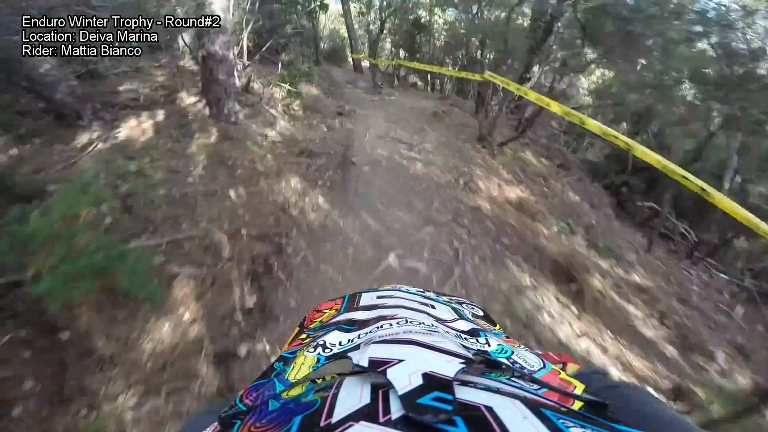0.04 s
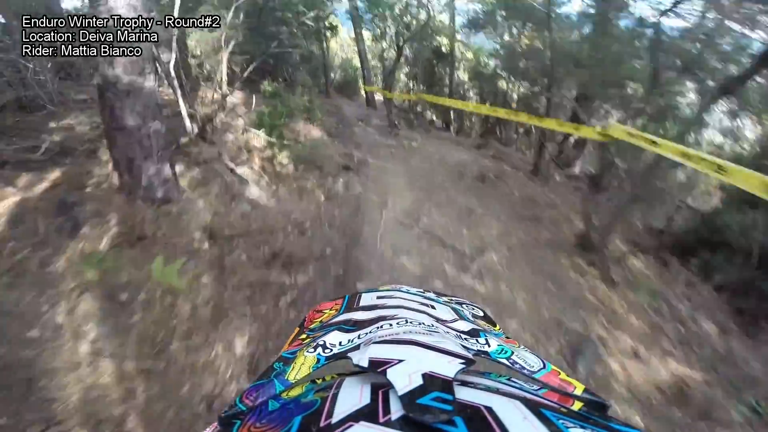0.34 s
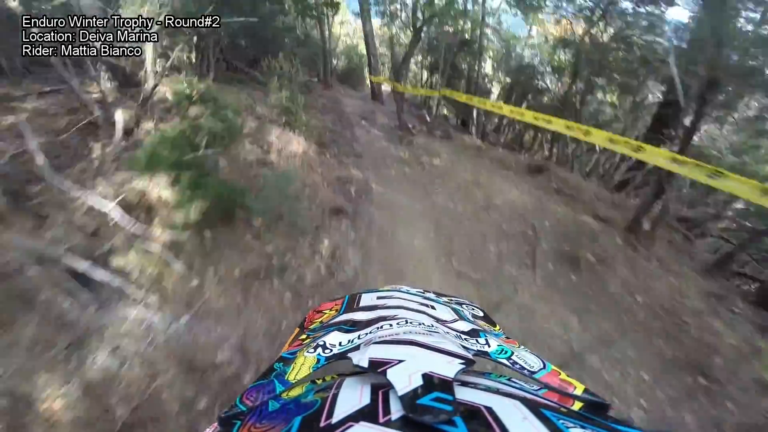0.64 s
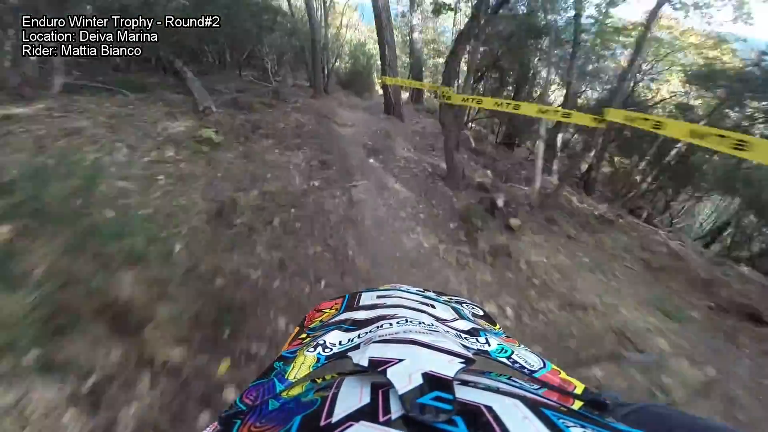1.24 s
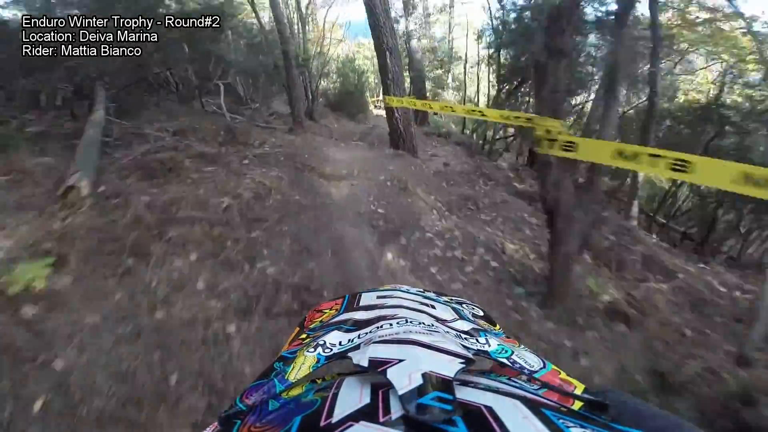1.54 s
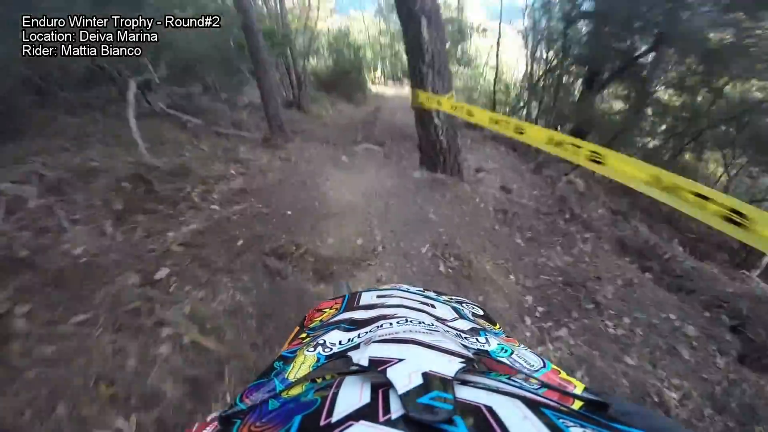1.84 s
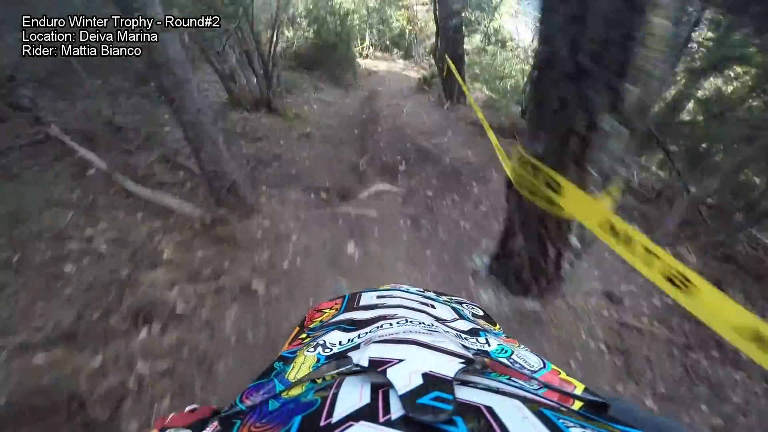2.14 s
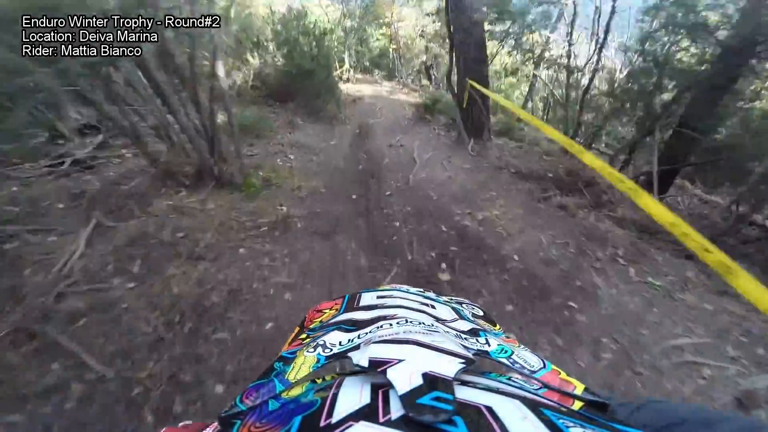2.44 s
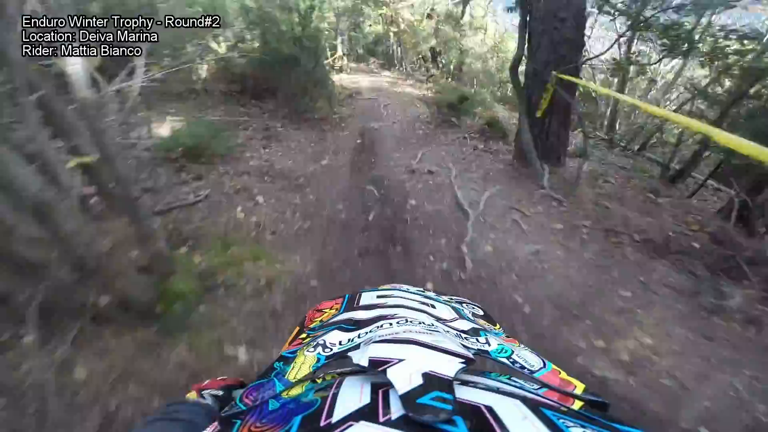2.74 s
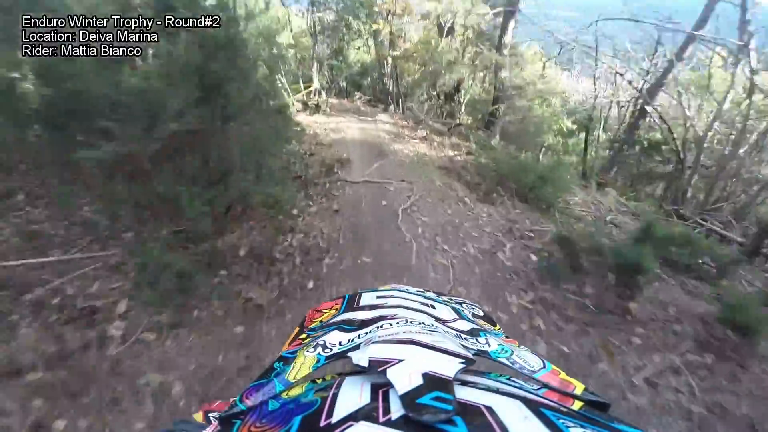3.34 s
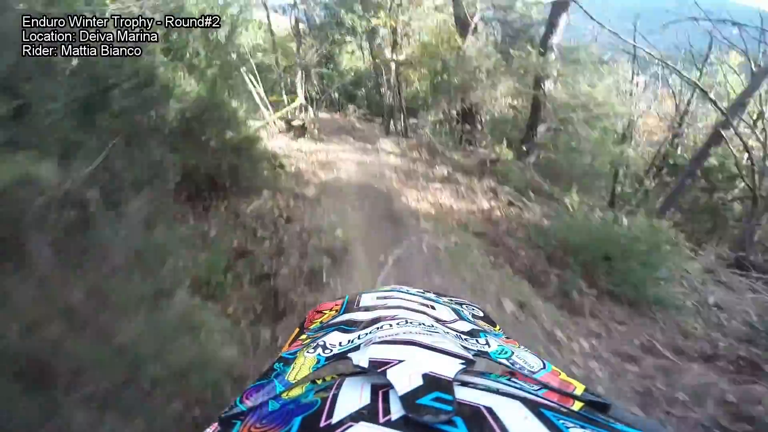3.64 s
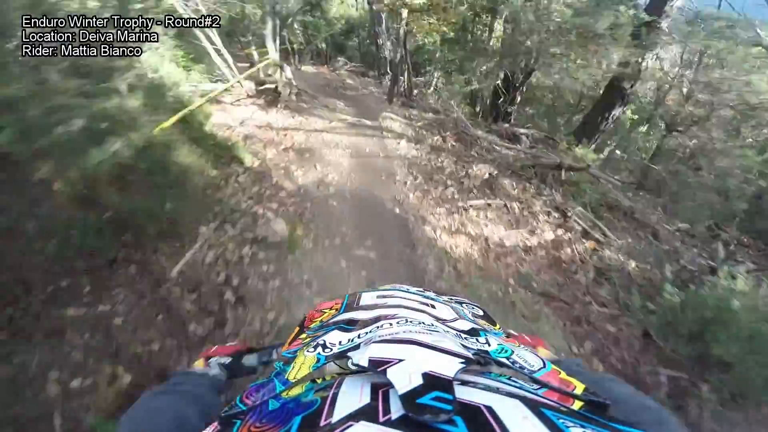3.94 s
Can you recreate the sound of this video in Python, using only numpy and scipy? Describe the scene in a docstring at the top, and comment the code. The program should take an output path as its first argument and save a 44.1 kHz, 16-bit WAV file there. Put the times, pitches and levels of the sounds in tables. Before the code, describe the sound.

A mountain bike runs down a rough forest trail, heard from the rider's helmet. Deep wind buffets the microphone throughout while the tyres rumble and crackle over grit, and the chain and fittings knock sharply at irregular moments.

```python
"""Deep wind buffeting, a hollow rush and sharp knocks: a mountain bike runs down a rough forest trail.
It is heard from a camera on the rider's helmet. Bumps shake the mount and wind hits the microphone.
Air and tyres make the rush, which swells and sinks, while grit crackles under the wheels.
Chain and fittings knock in quick double contacts, the drivetrain ticks and the camera whines faintly."""
import sys
import numpy as np
from scipy import signal
from scipy.fft import rfft, irfft
from scipy.io import wavfile
from scipy.ndimage import uniform_filter1d

SR = 44100
rng = np.random.default_rng(int(sys.argv[2]) if len(sys.argv) > 2 else 0)


def to_wav(s):
    """Save 16-bit WAV."""
    ch = np.atleast_2d(s).T  # columns
    pcm = np.round(np.clip(ch, -1, 1) * 32767)  # PCM
    wavfile.write(sys.argv[1], SR, pcm.astype(np.int16))


N = 176400
T = np.arange(N) / SR

# The tone colour of each sound. Each row: frequency in Hz, relative level in dB.
CAMERA_HISS_COLOUR = [(100, -1), (8000, 4), (11800, -1), (13000, -7), (15000, -15), (16000, -23)]
TICK_COLOUR = [(1500, -8), (3300, -27), (3900, -10.5), (4500, 0.5), (4900, -13), (5300, -18), (8000, -26),
               (16000, -50)]
DRONE_COLOUR = [(40, -2.5), (82, 1.5), (118, -4), (145, 3.5), (175, -5.5), (230, -14.5), (400, -20),
                (2000, -56)]
ROAR_COLOUR = [(80, -14), (200, 2), (300, 0), (420, -2.5), (650, -6), (850, -5.5), (1200, -10),
               (2500, -23.5), (8000, -49)]
DIRT_COLOUR = [(1500, 7.5), (3600, -3), (4400, 5.5), (5200, 4), (5900, -11), (6600, -3), (7500, -14),
               (9000, -12), (11500, -23), (13000, -28), (16000, -36)]
GRIT_COLOUR = [(500, -11), (1500, 8), (2800, 18), (3300, -8), (4500, -2.5), (5300, -1.5), (6500, -1.5),
               (8000, -26), (11500, -15.5), (14000, -39), (16000, -34)]
SCUFF_COLOUR = [(1500, -4), (4500, 11), (6500, -1), (9000, -1), (11500, -9), (13000, -22), (16000, -28)]
HOLLOW_COLOUR = [(300, -40), (900, -23), (1170, -14.5), (1265, -7.5), (1318, 1), (1370, 1), (1450, -2.5),
                 (1620, -2.5), (1760, -9), (1950, -16), (2500, -36), (6000, -64)]
UPPER_RUSH_COLOUR = [(600, -15), (1500, 0), (2000, -6), (2280, 1), (2420, -1), (2620, 3), (2900, -1),
                     (3170, -4), (3370, -11.5), (3550, -5), (3780, -5), (4100, -20), (6000, -21),
                     (12000, -79)]
BUFFET_COLOUR = [(4, -20), (11, 7.5), (22, -3), (33, -8), (47, -3), (54, -17), (63, -22), (80, -38.5),
                 (110, -45), (300, -107), (1000, -100)]
CLICK_COLOUR = [(300, 3.5), (900, -9.5), (2600, -1.5), (3500, -3), (4500, 1.5), (5700, 0.5), (6600, -4.5),
                (7300, 3), (8100, -2), (9200, -9.5), (12000, -11.5), (13500, -26), (16000, -30)]

# How each sound swells and sinks. Each row: time in seconds, relative level in dB.
TICK_LEVELS = [(0, -79), (1.6, -72), (2, -63), (2.7, -66.5), (3, -61), (3.5, -64.5), (4, -66)]
DIRT_LEVELS = [(0, -64), (.24, -56.5), (.6, -60), (1, -57), (1.28, -55), (1.5, -69), (1.75, -69),
               (2.1, -66), (2.35, -55.5), (2.65, -66), (2.9, -67), (3.2, -61), (3.5, -69), (4, -67)]
GRIT_LEVELS = [(0, -54), (.4, -53.5), (.55, -53), (1.15, -54), (1.6, -62), (2.1, -57.5), (2.22, -55),
               (2.5, -67), (2.67, -48), (2.8, -60), (2.95, -53), (3.2, -57), (3.45, -63), (3.8, -55),
               (4, -60)]
BUFFET_LEVELS = [(0, -29.5), (.25, -21.5), (.7, -24.5), (1.2, -22.5), (1.5, -28), (1.75, -32.5), (1.9, -24),
                 (2.3, -24), (2.75, -23.5), (2.86, -29.5), (2.95, -21), (3.4, -20.5), (3.8, -24.5),
                 (4, -22.5)]
# Tyre rumble. Each row: time in seconds, then relative levels of the low drone and the roar in dB.
RUMBLE_LEVELS = [(0, -49, -53.5), (.5, -53, -51.5), (1.1, -45.5, -51.5), (1.45, -51.5, -51.5),
                 (1.75, -46, -53.5), (2.1, -57, -53.5), (2.5, -48, -55.5), (2.85, -52.5, -55),
                 (3.2, -60, -52), (3.6, -51, -55.5), (4, -53, -53)]
# The rush. Each row: time in seconds, then relative levels of the hollow and the upper part in dB.
RUSH_LEVELS = [(0, -40.5, -49), (.12, -43.5, -49.5), (.22, -38.5, -48.5), (.33, -43, -49.5),
               (.68, -43.5, -48.5), (.8, -40, -47), (.97, -39.5, -47), (1.15, -39, -45), (1.33, -36.5, -43),
               (1.48, -40, -47), (1.61, -40, -47.5), (1.71, -46.5, -53), (1.86, -40, -47),
               (1.99, -51.5, -57), (2.07, -44.5, -54), (2.17, -51.5, -59), (2.3, -54.5, -59),
               (2.47, -44.5, -52.5), (2.56, -46, -55), (2.62, -52, -63), (2.67, -42, -51), (2.84, -49, -56),
               (2.98, -41, -51.5), (3.13, -41.5, -49), (3.26, -41.5, -49), (3.42, -41, -49),
               (3.57, -50, -55), (3.68, -46.5, -57.5), (3.78, -43.5, -51), (4, -44, -54.5)]

# The camera's whine. Each row: pitch in Hz, level in dB.
WHINE_TONES = [(5846, -77.5), (8780.5, -77), (11700, -86)]
# Drivetrain pings and tyre scuffs. Each row: start in seconds, level in dB.
METAL_PINGS = [(1.928, -43), (2.016, -40), (2.219, -47), (2.915, -45.5), (2.979, -45), (3.354, -50),
               (3.849, -37.5)]
TYRE_SCUFFS = [(.395, -54), (2.188, -58), (2.216, -53), (2.232, -57.5), (2.315, -52.5), (2.66, -52),
               (3.15, -54), (3.182, -53)]
# Thin squeaks. Each row: start in seconds, length in seconds, level in dB.
HIGH_SQUEAKS = [(1.443, 0.022, -71), (1.476, .009, -68), (1.516, .016, -69), (1.574, .014, -74),
                (1.601, .013, -70), (1.642, 0.02, -68)]
# Bumps. Each row: time in seconds, then relative levels of helmet sway and mount shudder in dB.
TRAIL_BUMPS = [(0.258, -11.5, -41), (0.376, -29, -19.5), (0.469, -15, -45), (0.572, -12, -13.5),
               (.83, -29, -26), (1.004, -21, -12), (1.159, -24, -13), (1.395, -20.5, -19),
               (1.564, -19, -25.5), (1.844, -20.5, -22), (2.085, -8.5, -12), (2.302, -11, -19),
               (2.43, -15, -39), (2.52, -30, -24), (2.673, -26, -17), (2.916, -22, -10.5),
               (2.996, -12, -20), (3.122, -31, -10.5), (3.189, -8.5, -23.5), (3.325, -19, -19),
               (3.415, -24, -20), (3.575, -18.5, -21), (3.69, -14, -17.5), (3.869, -19, -26.5)]
# Knocks and chain slaps. Each row: start in seconds, relative levels of click, ring and thud in dB,
# wait for the rebound in milliseconds, rebound click in dB compared with the first click.
CHAIN_KNOCKS = [(0.2053, -35, -40, -35, 3.2, -4), (0.2285, -46, -28.5, -45, 8, -1),
                (0.6414, -38.5, -27, -30, 3.3, 10), (0.7232, -34.5, -31, -34.5, 2.43, 8),
                (0.865, -32, -30, -41, 3.4, 3), (0.991, -33, -26.5, -35, 3.8, -12),
                (1.0047, -40, -46, -38, 4.1, 1), (1.0118, -30.5, -28, -46, 2.2, -16),
                (1.1174, -34.5, -29, -49, 1.86, 1.5), (1.175, -46, -34.5, -57, 1.9, -12),
                (1.3574, -30, -36, -51, 2.5, -11), (1.3913, -46, -48, -50, 1.7, -10),
                (1.9345, -48, -42, -50, 1.5, -6), (2.0368, -36.5, -34.5, -53, 3.1, 7.5),
                (2.1579, -37.5, -39, -36, 1.54, -10), (2.194, -52, -43, -37.5, 1.8, -10),
                (2.2753, -29.5, -53, -32, 3.14, 1.5), (2.3535, -26.5, -26, -31, 3.8, -19),
                (2.3627, -26, -31, -41, 1.5, -25), (2.41, -29.5, -30, -38.5, 2.6, -10),
                (2.5787, -30, -26.5, -43, 2.06, 3), (2.6369, -28.5, -29.5, -33.5, 2.5, -5),
                (2.659, -46, -33, -29, 5.7, -14), (2.8368, -39.5, -29, -32.5, 4.4, 5),
                (2.8985, -42, -33.5, -37, 1.6, -14), (3.0920, -28.5, -38, -48, 0.88, 3.5),
                (3.1178, -51, -35, -45, 5.7, 2), (3.235, -42.5, -33.5, -38, 1.6, 12.5),
                (3.5348, -34.5, -26.5, -39, 1.32, 2.5)]
# The tones a knock rings with. Each row: typical pitch in Hz, relative level in dB, seconds to fade 60 dB.
RING_TONES = [(500, -11, 0.013), (732, -7.5, 0.016), (847, -5, 0.02), (1025, -9.5, 0.019),
              (1440, -5, .0083), (1684, -4.5, 0.021), (2300, -11, 0.017), (2730, -2, 0.016),
              (4600, -10, 0.018), (5500, -13, 0.013)]


def amp(db):
    """Turns decibels into a number to multiply by."""
    return 10 ** (np.asarray(db) / 20)


def level(rows, column=1):
    """Joins the points of a level table into a smooth gain over time."""
    rows = np.array(rows)
    return amp(np.interp(T, rows[:, 0], rows[:, column]))


def unit(x):
    """Scales a signal to an average (rms) level of 1."""
    return x / np.sqrt(np.mean(x ** 2) + 1e-20)


def gain_at(colour, hz):
    """Reads the gain at each frequency from a colour table."""
    table_hz, db = np.transpose(colour)
    return amp(np.interp(np.log(hz + 1), np.log(table_hz + 1), db))


def add(mix, start, sound):
    """Mixes a sound in at a start time in seconds."""
    part = mix[max(round(start * SR), 0):][:len(sound)]
    part += sound[:len(part)]


def drift(rate_hz):
    """A random wander; a higher rate makes it quicker."""
    hz = np.fft.rfftfreq(N, 1 / SR)
    return unit(irfft(rfft(rng.standard_normal(N)) * np.exp(-(hz / rate_hz) ** 2), N))


def noise(colour, flutter_db, flutter_hz):
    """Coloured noise whose level flutters at random by about flutter_db."""
    spectrum = rfft(rng.standard_normal(N)) * gain_at(colour, np.fft.rfftfreq(N, 1 / SR))
    return unit(irfft(spectrum, N) * amp(flutter_db * drift(flutter_hz)))


def steady(x, window_s=0.092, share=0.51):
    """Partly evens out the chance swells of a noise."""
    power = abs(uniform_filter1d(x ** 2, round(window_s * SR))) + 1e-6
    return unit(x / power ** (share / 2))


def tint(x, colour, size=2048):
    """Gives a sound a tone colour while keeping its sudden starts sharp."""
    log_gain = np.log(gain_at(colour, abs(np.fft.fftfreq(size, 1 / SR))))
    taps = np.fft.ifft(np.exp(np.conj(signal.hilbert(log_gain)))).real[:size // 2]
    return signal.oaconvolve(x, taps / np.linalg.norm(taps))[:N]


def grains(colour, per_s, spread_db, decay_s):
    """Tiny contacts of random size at random moments, each a fading burst of noise."""
    hits = rng.random(N) < per_s / SR
    sizes = amp(spread_db * np.minimum(rng.exponential(1, N), 2))
    fades = signal.lfilter([1], [1, -np.exp(-1 / (decay_s * SR))], hits * sizes)
    return unit(tint(fades * rng.standard_normal(N), colour))


def drivetrain(ping_hz=4360, ping_s=0.0021, squeak_hz=9900, rise_hz=350):
    """The chain and gears give light metallic ticks, single pings and a few rising squeaks."""
    out = level(TICK_LEVELS) * grains(TICK_COLOUR, per_s=170, spread_db=0.5, decay_s=0.0012)
    t = T[:SR // 20]
    for start, db in METAL_PINGS:
        hz = ping_hz * (1 + 0.046 * rng.standard_normal())
        add(out, start, amp(db) * np.exp(-t / ping_s) * np.sin(2 * np.pi * hz * t))
    wobble_hz = 130 * drift(rate_hz=300)
    for start, length, db in HIGH_SQUEAKS:
        progress = np.linspace(0, 1, round(length * SR))
        hz = squeak_hz + rise_hz * progress + wobble_hz[round(start * SR):][:len(progress)]
        add(out, start, amp(db) * np.sin(np.pi * progress) * np.sin(2 * np.pi * np.cumsum(hz) / SR))
    return out


def tyres(scuff_s=0.02):
    """Rolling tyres rumble, hiss on loose dirt, crackle over grit and briefly scuff."""
    drone = level(RUMBLE_LEVELS) * noise(DRONE_COLOUR, flutter_db=0, flutter_hz=25)
    roar = level(RUMBLE_LEVELS, column=2) * noise(ROAR_COLOUR, flutter_db=1.9, flutter_hz=61)
    hiss = level(DIRT_LEVELS) * noise(DIRT_COLOUR, flutter_db=1.2, flutter_hz=60)
    grit = level(GRIT_LEVELS) * grains(GRIT_COLOUR, per_s=250, spread_db=7, decay_s=0.0022)
    slip = np.zeros(N)
    for start, db in TYRE_SCUFFS:
        add(slip, start, amp(db) * np.hanning(round(scuff_s * SR)))
    scuffs = slip * grains(SCUFF_COLOUR, per_s=430, spread_db=5, decay_s=0.00044)
    return amp(0.5) * (drone + roar) + amp(-3.2) * hiss + grit + scuffs


def wind():
    """Wind buffets the microphone, while air and tyres make a hollow, fluttering rush."""
    buffet = level(BUFFET_LEVELS) * steady(noise(BUFFET_COLOUR, flutter_db=2.5, flutter_hz=5.6))
    hollow = level(RUSH_LEVELS) * steady(noise(HOLLOW_COLOUR, flutter_db=0.5, flutter_hz=60.3))
    upper = level(RUSH_LEVELS, column=2) * noise(UPPER_RUSH_COLOUR, flutter_db=1.24, flutter_hz=45.7)
    return buffet + amp(-1.56) * hollow + amp(0.76) * upper


def bumps(sway_s=0.012, mount_hz=47.6, mount_s=0.041, thump_s=0.039, cutoff_hz=53.7):
    """At each bump the wheels thump, the helmet dips and the padded camera mount shudders."""
    shake, thumps = np.zeros(N), np.zeros(N)
    t = T[:SR // 2]
    rise = 1 - np.exp(-(t / 0.01) ** 2)
    shudder = -rise * np.exp(-t / mount_s) * np.cos(2 * np.pi * mount_hz * t)
    swell = t / thump_s * np.exp(1 - t / thump_s)
    for time, sway_db, shudder_db in TRAIL_BUMPS:
        offset = (T - time) / sway_s
        shake += amp(sway_db) * (offset ** 2 - 1) * np.exp(-offset ** 2 / 2)  # one dip
        add(shake, time, 2 * amp(shudder_db) * shudder)
        strength = np.hypot(amp(sway_db), amp(shudder_db))
        add(thumps, time - 0.033, strength * swell)  # the thump starts just before the dip
    keep_lows = 1 / (1 + (np.fft.rfftfreq(N, 1 / SR) / cutoff_hz) ** 10)
    shake = irfft(rfft(shake) * keep_lows, N)
    return shake + amp(-36.5) * thumps * noise(DRONE_COLOUR, flutter_db=3, flutter_hz=30)


def knocks(thud_below_hz=1150, pitch_spread=0.07):
    """Chain and fittings hit and rebound; each contact clicks and sets short tones ringing."""
    clicks, rings = np.zeros(N), np.zeros(N)
    t = T[:SR // 20]
    hz, tone_db, fade_s = np.transpose(RING_TONES)[:, :, None]
    snap_and_tail = 2 * np.exp(-t / 0.00064) + amp(-25) * np.exp(-t / 0.0098)
    click_shape = (1 - np.exp(-t / 0.00033)) * snap_and_tail
    ring_shape = (1 - np.exp(-t / 0.00051)) * amp(-60 * t / fade_s)
    for start, click_db, ring_db, thud_db, wait_ms, rebound_db in CHAIN_KNOCKS:
        strength = amp(tone_db + np.where(hz < thud_below_hz, thud_db, ring_db))
        first = (start, click_db, 0)
        rebound = (start + wait_ms / 1000, click_db + rebound_db, -1)
        for time, contact_db, ring_change_db in first, rebound:
            add(clicks, time, amp(contact_db) * click_shape * rng.choice([-1, 1], len(t)))
            pitch = hz * (1 + pitch_spread * rng.standard_normal(hz.shape))
            signs = rng.choice([-1, 1], hz.shape)
            tones = signs * strength * ring_shape * np.sin(2 * np.pi * pitch * t)
            add(rings, time, amp(ring_change_db) * tones.sum(0))
    return tint(clicks, CLICK_COLOUR) + rings


def scene():
    """Everything that reaches the helmet, in one channel."""
    return (wind() + tyres() + bumps() + knocks() + drivetrain())[None]


def record(dry):
    """The camera adds its thin whine and hiss, then cuts the treble above 15800 Hz."""
    whine = sum(np.sqrt(2) * amp(db) * np.sin(2 * np.pi * hz * T) for hz, db in WHINE_TONES)
    hiss = amp(-71.5) * tint(rng.standard_normal(N), CAMERA_HISS_COLOUR)
    treble_cut = signal.firwin(511, 15800, window=("kaiser", 9), fs=SR)
    return signal.oaconvolve(dry + whine + hiss, treble_cut[None], "same")


dry = scene()
out = record(dry)
to_wav(out)
```